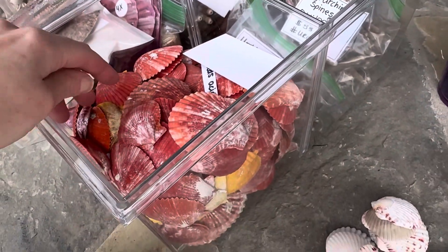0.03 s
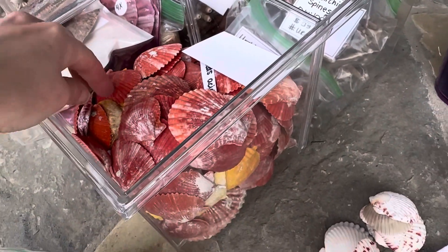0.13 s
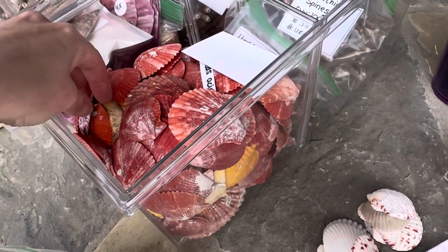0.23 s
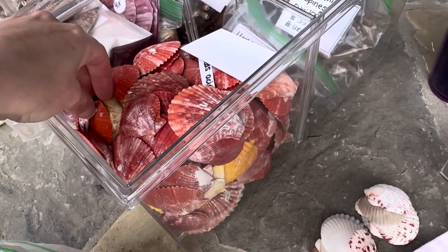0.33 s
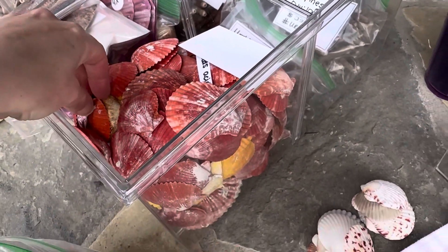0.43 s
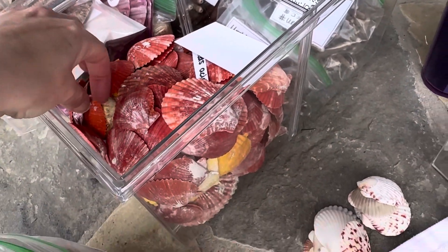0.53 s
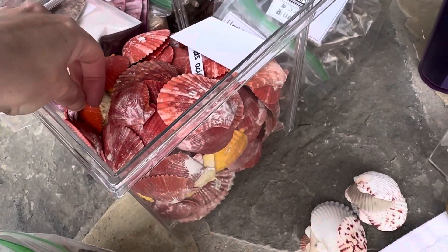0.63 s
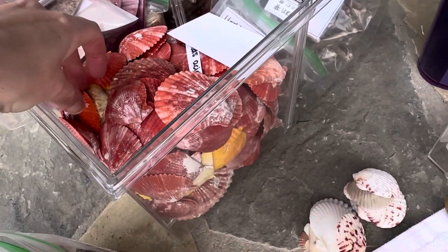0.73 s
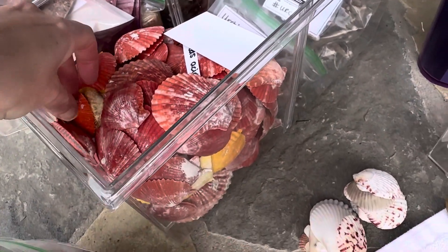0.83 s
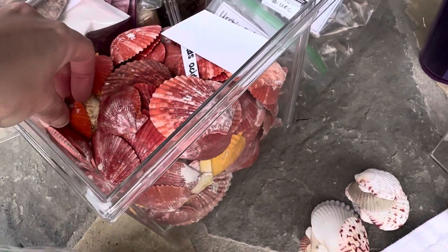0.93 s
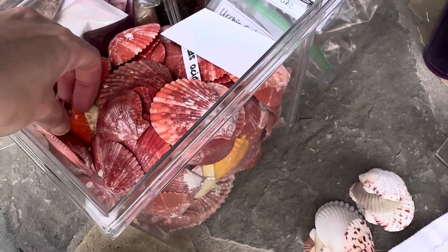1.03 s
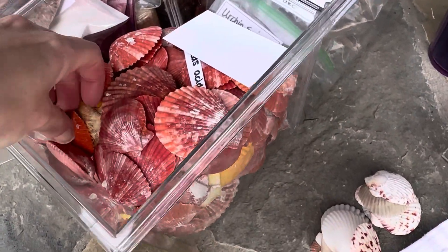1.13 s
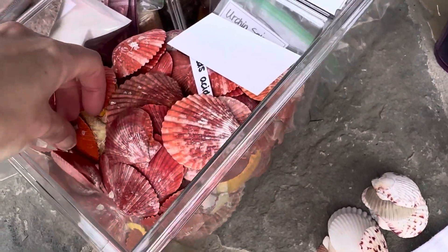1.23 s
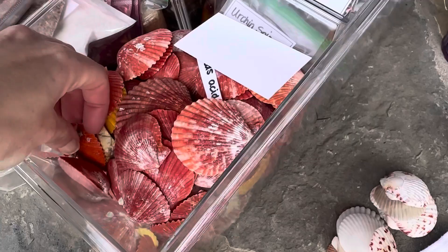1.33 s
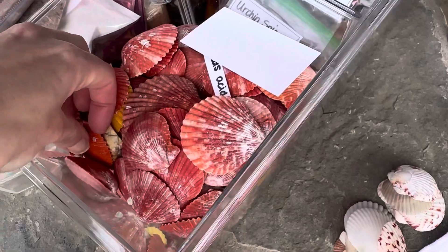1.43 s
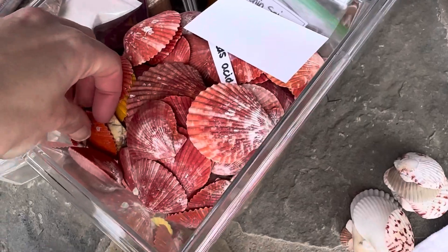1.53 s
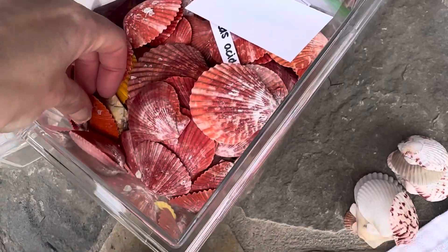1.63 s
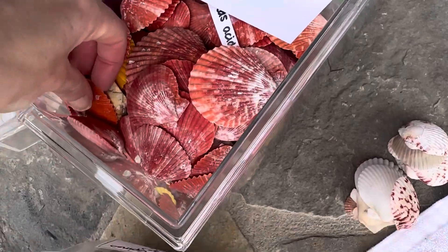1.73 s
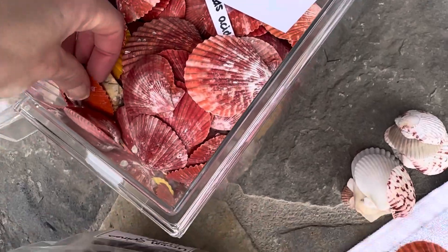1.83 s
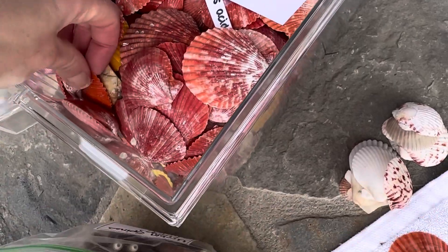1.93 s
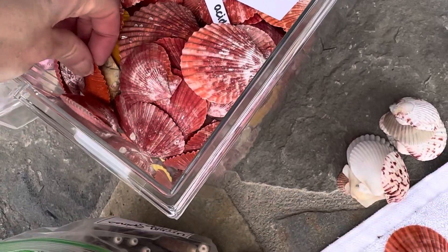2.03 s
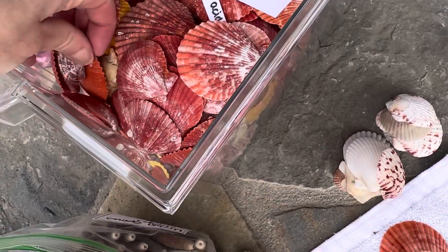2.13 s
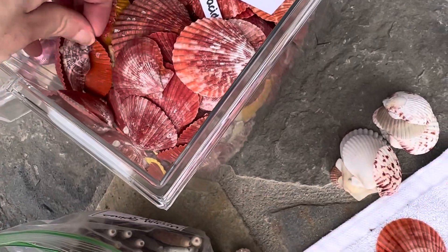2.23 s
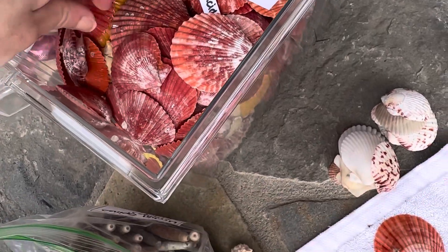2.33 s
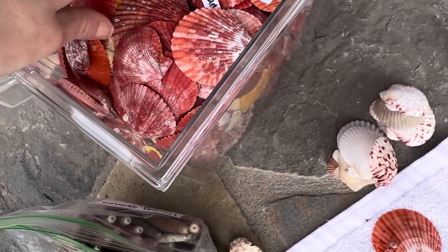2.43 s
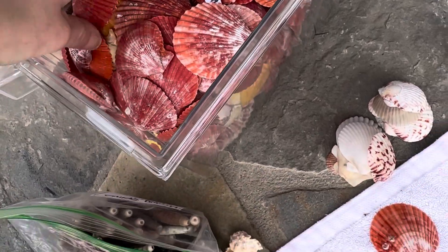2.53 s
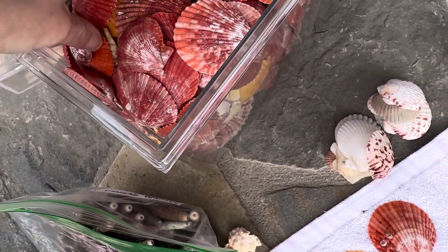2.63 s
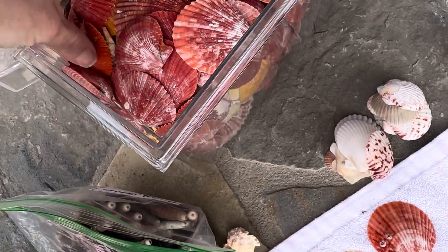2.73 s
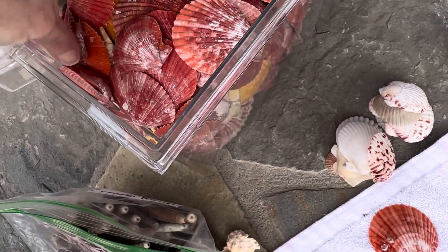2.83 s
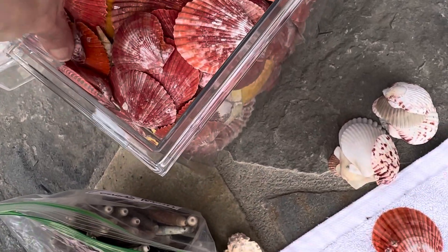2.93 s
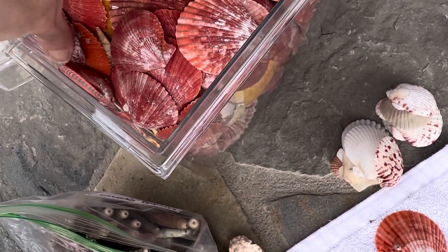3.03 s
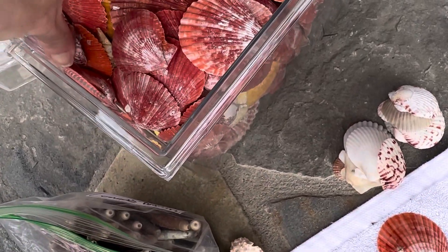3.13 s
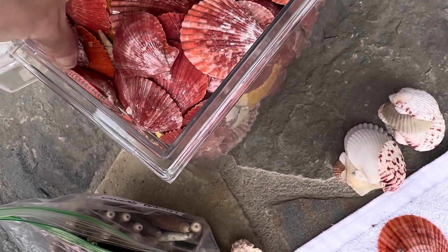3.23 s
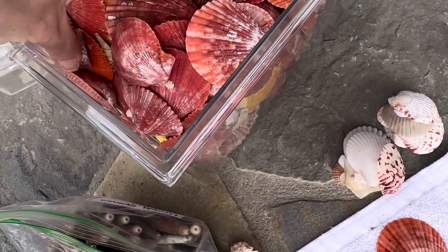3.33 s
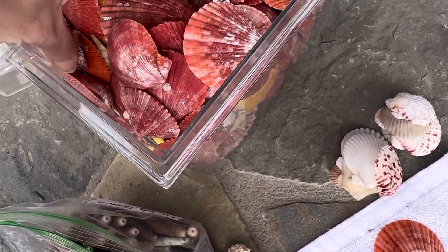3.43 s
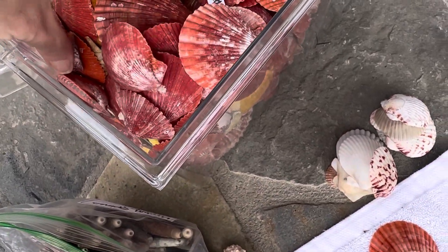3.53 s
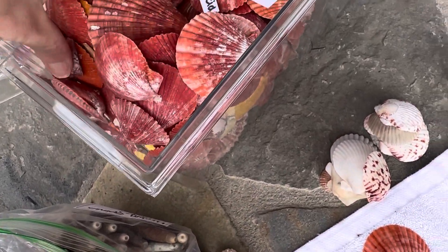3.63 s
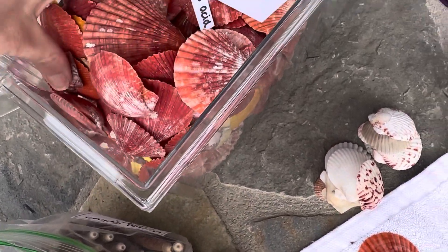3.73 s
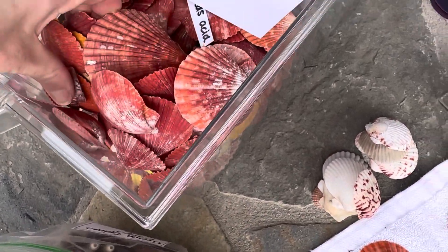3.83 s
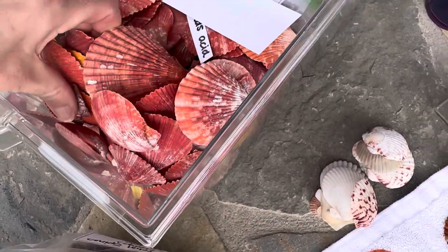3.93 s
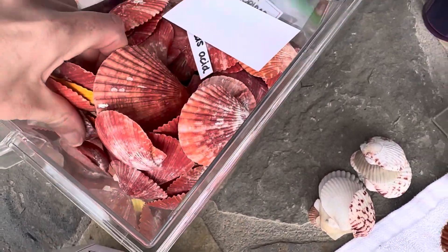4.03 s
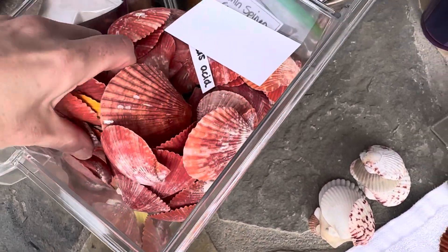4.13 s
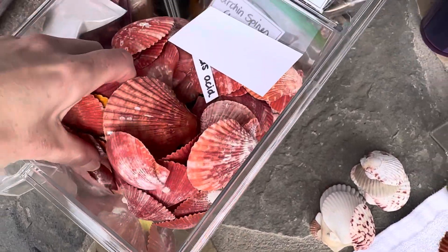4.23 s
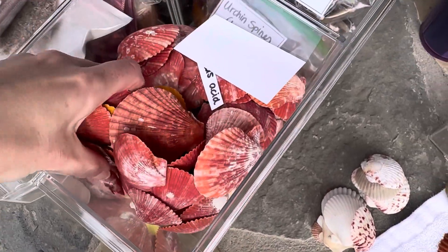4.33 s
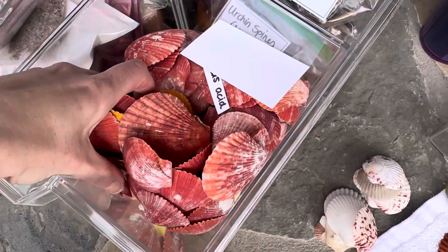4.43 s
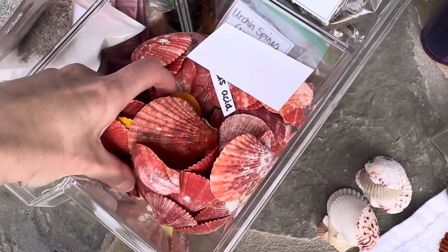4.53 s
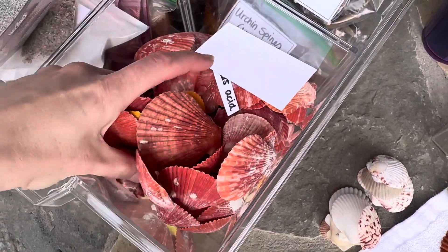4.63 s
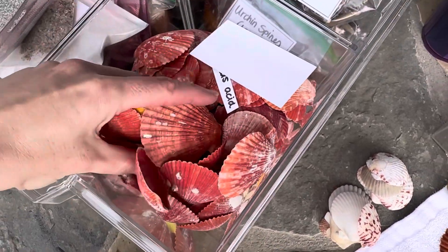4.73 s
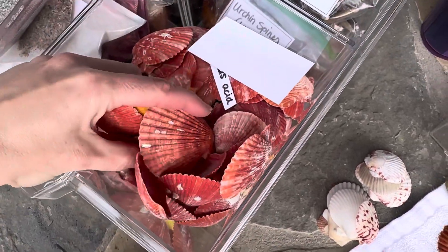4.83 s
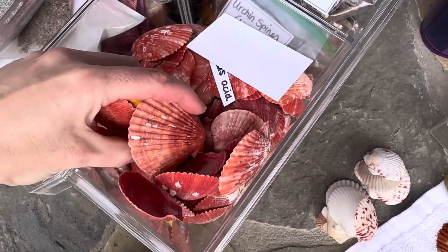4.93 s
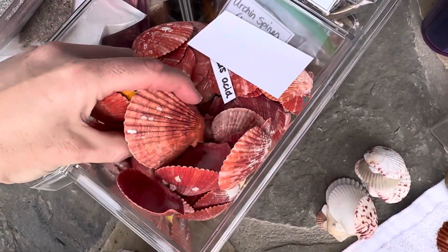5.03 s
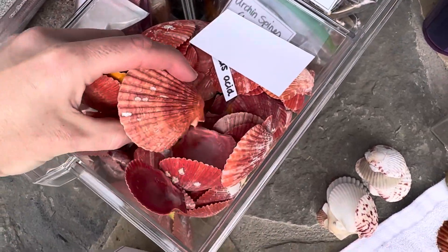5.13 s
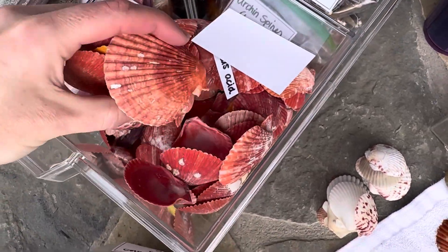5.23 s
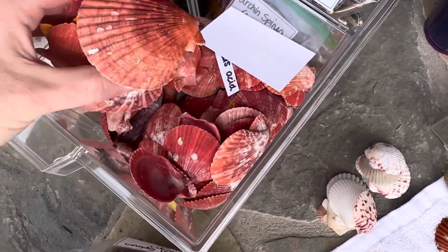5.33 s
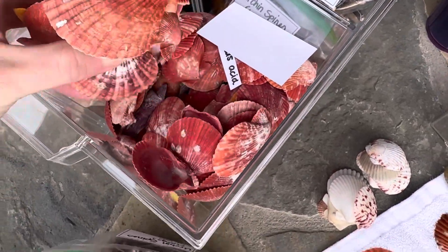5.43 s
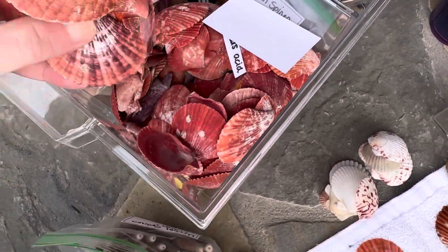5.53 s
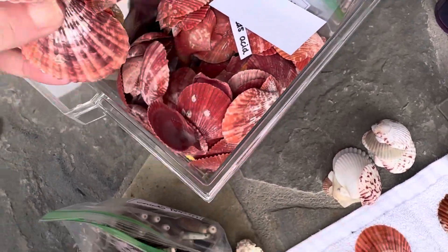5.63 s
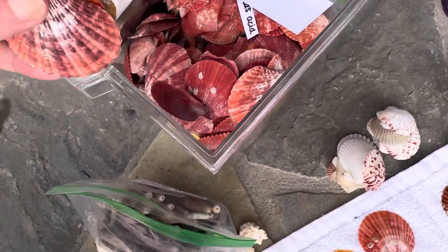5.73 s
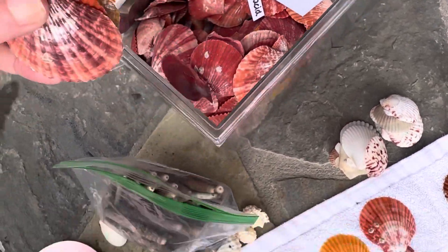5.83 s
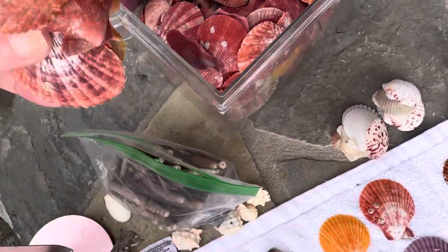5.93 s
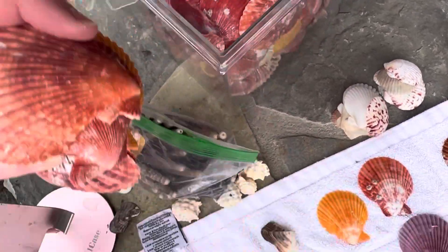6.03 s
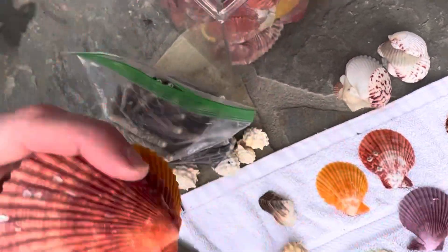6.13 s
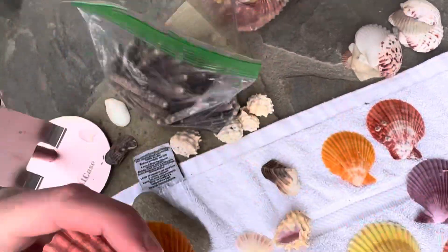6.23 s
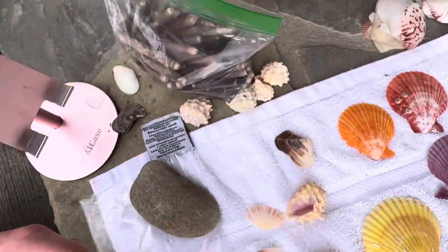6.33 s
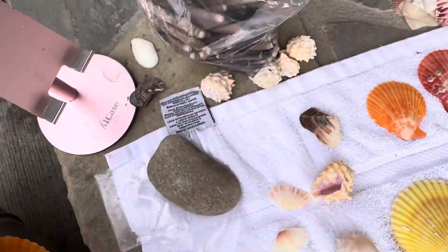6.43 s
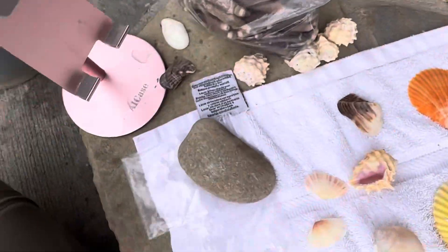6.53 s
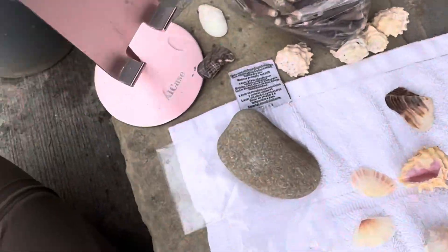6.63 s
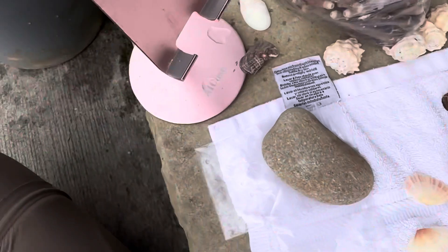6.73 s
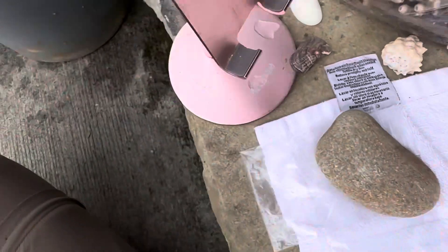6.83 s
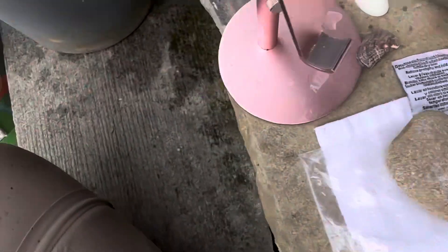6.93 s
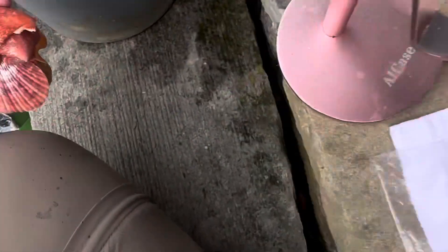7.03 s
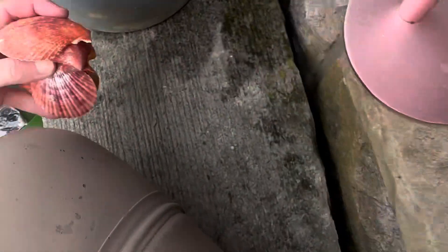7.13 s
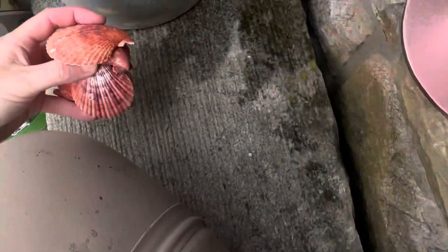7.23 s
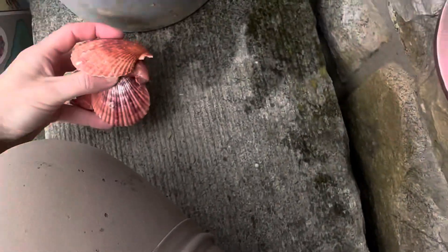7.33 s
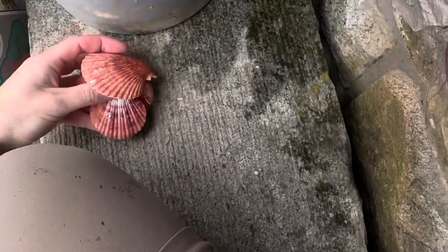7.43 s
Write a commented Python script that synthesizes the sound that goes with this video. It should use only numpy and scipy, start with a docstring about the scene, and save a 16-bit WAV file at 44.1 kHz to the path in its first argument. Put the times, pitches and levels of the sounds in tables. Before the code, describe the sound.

Close up outdoors, a hand digs through dry ribbed seashells in a thin plastic bin. Faint ticks grow into dense, irregular clacks and short gritty scrapes, with the bin wall knocking hollowly. After the last sharp clacks the rummaging stops, leaving low distant traffic, soft far tapping and thin bird chirps, before the lifted shells click crisply in the palm. Hand-held stereo phone, short yard echo.

```python
"""Rummaging through scallop shells

A hand rummages through dry shells in a clear plastic bin outdoors, close to a hand-held phone.
Shells clack as bursts of fast-dying noise, ribs rasp as streams of tiny ticks, and the bin wall resonates.
Then a handful is lifted and clicks in the palm. Far traffic rumbles as slowly swelling noise with a
faint rustle; a distant machine taps about eight times a second and small birds call as gliding tones."""
import sys
import numpy as np
from scipy import signal
from scipy.fft import rfft, irfft, next_fast_len
from scipy.io import wavfile
from scipy.ndimage import uniform_filter1d, map_coordinates

SR = 44100
rng = np.random.default_rng(int(sys.argv[2]) if len(sys.argv) > 2 else 0)


def invert_db(level):
    """Linear amplitude ratio for a level in decibels (20 dB per decade), elementwise."""
    return 10 ** (np.asarray(level, dtype=float) / 20)


def transcribe(u):
    """Save the signal u as a 16-bit wav file named by the first command-line argument.

    u: samples, shape (n,) or (channels, n), limited to [-1, 1]; the rate is SR.
    q: integer samples, one column per channel.
    """
    v = np.clip(np.atleast_2d(u).T, -1, 1)
    q = np.round(v * 32767).astype(np.int16)
    wavfile.write(sys.argv[1], SR, q)


N = 330264

# Single knocks of shell on shell: middle_s, level_db (before length adds energy),
# bowl_db (hollow of the shell, relative to the clack), edge_db (brittle treble, likewise), length_ms
SHELL_CLACKS = [(0.1196, -59, 0, -35, 6), (0.155, -63, 5, -25, 10), (0.2263, -40, -3, -23.0, 6.1),
                (0.2587, -44.5, 4, -20, 7), (0.3311, -44.5, -2, -14.5, 7.6), (0.3507, -51.5, 9, -19.5, 7),
                (0.4029, -47, 5, -11, 14.7), (0.4611, -37, -3.5, -1, 13), (0.4781, -41.5, -10, -13.5, 5.3),
                (0.5084, -37, -2, -12, 5.9), (0.5181, -32, 4, -19.5, 3.6), (0.528, -37.0, -7.5, -7.5, 4.6),
                (0.643, -33.5, -8, -22, 5.4), (0.6646, -27, -2, -12.5, 11.2), (0.79, -55, -5, -17.5, 6),
                (0.8109, -35.0, -3, -19, 13), (0.8306, -24.5, 1.5, -6.5, 8.5), (0.8641, -25, 6, -8, 5.7),
                (0.8793, -29.5, -11, -10.0, 11.4), (0.9482, -41, -9, -1.5, 6.2),
                (0.9751, -19, -4.0, -3, 5.3), (1.0484, -19.0, -1.5, -8.0, 6.9),
                (1.0889, -24.5, 0.5, -9, 6.0), (1.182, -43, 5, -14.5, 10.4), (1.2234, -37.5, 6, -7.5, 8),
                (1.2512, -18.5, 0.5, -3, 7.1), (1.269, -20, 3, -1, 6.6), (1.3022, -19, -0.5, -2.5, 19.6),
                (1.3512, -37.5, -3, -6.5, 15), (1.4183, -44, -3, -8, 7.5), (1.4813, -53, 10.5, -9, 10.6),
                (1.5023, -53, 6.5, -2, 7.3), (1.5773, -14.5, -5, -11, 8.5),
                (1.5976, -25.5, -7.0, -4.5, 9.0), (1.6969, -41.5, 4.5, -12.5, 13),
                (1.7154, -45, 4, -21.0, 3.1), (1.8164, -37.0, 7, -10.5, 10.2),
                (1.847, -40, 8.5, -19.5, 5.6), (1.9293, -40.5, 1, -5, 10.6), (1.947, -34, -1, -14.5, 5),
                (1.9598, -32.5, -2, -3.5, 12), (2.0027, -27.5, 0, -10.5, 12.1),
                (2.0389, -37.5, -1.5, -9.5, 8), (2.0534, -39.5, 1.5, -4.5, 7.8),
                (2.0682, -44.5, 2.5, -19.0, 27), (2.0877, -40.5, 0.5, -11, 14.4),
                (2.1016, -21, -10.5, -15.5, 5.2), (2.175, -36, 0, -14, 5.4), (2.1825, -37.5, 5.5, -9, 6.7),
                (2.2075, -32.5, -3.5, -0.5, 18), (2.2345, -24.5, -8, -1, 7.5),
                (2.2448, -22.5, -5, -1.5, 12.7), (2.2549, -22, -18, -3.5, 7), (2.2661, -18.5, -3, -4, 11.6),
                (2.2787, -22, -12, -3, 6.2), (2.4231, -33.5, 2.0, -10.5, 4.4), (2.4462, -30, -2, -8.5, 5.7),
                (2.4806, -35.5, 2.5, -6.5, 6.2), (2.5292, -33, 0.5, -18, 6.3), (2.5673, -20, -5, -12, 5.2),
                (2.5874, -20.5, -11, -4, 5.6), (2.6102, -28.5, 4, -13, 6.7), (2.6498, -29.5, 7, -1.5, 3.8),
                (2.789, -19.5, -1.5, -6.0, 6.1), (2.8099, -21.5, 0.5, -18.5, 5.0),
                (2.82, -27.5, -1, -20, 9), (2.8654, -33, -13.5, -4.5, 5.8), (2.9079, -35, 1, -3, 13),
                (2.957, -24, -4, -3, 5.3), (2.9847, -31, -11.5, -2.5, 20), (3.0422, -37, 12.5, -7, 7.5),
                (3.1422, -37, 7, -17.5, 7.5), (3.1669, -40.5, 1.0, -10.0, 13),
                (3.2165, -20.5, -4.5, -5.5, 12), (3.229, -26.5, -7, -14.5, 8),
                (3.2704, -31, 1.5, -0.5, 6.2), (3.3009, -32.5, -12.5, -10.5, 9.4),
                (3.3293, -17, -6.5, -3, 7), (3.3501, -20, -4, -4.5, 11.3), (3.4651, -28, -12.5, -18.5, 3.8),
                (3.4756, -31, -15, -4, 4), (3.4962, -42, -6.0, -13.5, 8.4), (3.5093, -40, -14, -13, 3.6),
                (3.5685, -28.0, -12, -12.5, 8.2), (3.5803, -26, -7.5, -8.5, 6.2),
                (3.6077, -31, -1.5, -2, 4.2), (3.6195, -28, -5.5, -11.5, 11), (3.6322, -28, 1.0, 0, 6.1),
                (3.6713, -24, -1, -6, 10.7), (3.7173, -28, -4.5, -8, 10.2), (3.733, -29.5, 4, -11, 4.7),
                (3.7506, -28.5, 0.5, -6.5, 8.3), (3.7796, -43.5, 3.5, -16.5, 15),
                (3.8454, -50.5, 14, -18, 13.7), (3.8784, -48.5, -2, -18.5, 8.3), (3.92, -20, -1.5, -4, 6.4),
                (3.9326, -31.5, -7.5, -13, 8.3), (3.9644, -35.5, -10, 6.5, 4.2),
                (3.9931, -13, -5.5, -9.5, 8), (4.01, -19.5, -5, -13.5, 16), (4.0475, -18.5, -3, -10, 4.5),
                (4.099, -40, 1, -11.5, 5.0), (4.1335, -36, -10, -10, 8.8), (4.1431, -28, 2, -10, 10.9),
                (4.1716, -24, -10.0, -4.0, 6.4), (4.1845, -23.5, -12, -5.0, 4.9),
                (4.2432, -37, -1.5, -12, 12.2), (4.2673, -21, -8, 1.5, 6.4), (4.3033, -21, -8.5, -3.5, 5.1),
                (4.3272, -37, -5, -5, 14.7), (4.3558, -36, -3, -0.5, 5.2), (4.3852, -25.5, -3, -10, 16),
                (4.4122, -25, 0, -11, 5.5), (4.4243, -29.5, -0.5, -9.5, 11.2),
                (4.4733, -23.5, -5.5, -1.5, 10), (4.5004, -30, -2.5, -1.5, 6),
                (4.5135, -28.5, -11, 4.5, 5.2), (4.5405, -23, -2.5, -1.5, 5.3),
                (4.5586, -16, -5.5, -9, 5.7), (4.565, -20.5, -3, -18.5, 7), (4.6088, -33, -20, 5.5, 9),
                (4.6335, -24, -11, -6.5, 12.5), (4.6671, -23, -2, -12, 4.5), (4.6962, -26, -7, -9, 7.9),
                (4.7228, -22.5, -5, -10, 17), (4.7813, -19.5, -10.5, -3, 6.4), (4.793, -23, -8, -11.5, 14),
                (4.8168, -24, -3.5, -10, 16.7), (4.8597, -35.5, -2.5, -11, 7.0),
                (4.8899, -16.5, -7.5, -8, 8.7), (4.94, -20.5, -10, -14, 12),
                (4.9537, -16, -8.0, -17.5, 5.2), (4.9735, -31, 1, -23.5, 6), (5.0568, -30, -12.5, -13, 6.6),
                (5.0806, -30.5, -3, -22, 4.5), (5.1065, -31.5, -4, -5.5, 7.5),
                (5.1167, -31, -9.5, -17, 9.7), (5.1341, -31.0, -5, -16.0, 4.7),
                (5.2365, -22.5, -8.5, -11, 5.2), (5.25, -20, -9.5, -4.5, 6.5),
                (5.2868, -26.5, -17.5, -1.5, 8.5), (5.3037, -21, -10.5, -7, 17.5),
                (5.3251, -17.5, -14, -5, 3.8), (5.4573, -45, -5.5, -17, 4.3),
                (5.4853, -20.5, -28, -4.0, 7.2), (5.5007, -27.5, -24, -2, 15),
                (5.5314, -38.5, -25, -8.5, 4.5), (5.6256, -12.5, -9.5, -4, 7),
                (5.6599, -32.5, -6, -7.5, 10.5), (5.6751, -19.5, -12.5, -1.5, 5.7),
                (5.7082, -16.5, -1, -9, 6.8), (5.9509, -42.5, -15, -6.5, 11.6), (6.898, -44.5, -15, -11, 7),
                (7.2398, -47, -17.0, -12.5, 12.5), (7.2722, -50.5, -18.0, -17, 8.5),
                (7.3271, -49.5, -16, -18, 7.4), (7.3703, -40.5, -21, -16.5, 11),
                (7.4052, -35.5, -20, -13, 3), (7.423, -28, -37, -8.5, 10), (7.434, -18, -27, -0.5, 9),
                (7.4488, -16.5, -30.5, -5.5, 13), (7.4578, -17, -30, -4.5, 10),
                (7.4765, -31.5, -27, -7.5, 8.8)]
THUD_DB, THUD_SCATTER_DB = -9.5, 1.5  # the bin thuds with the bowl of the shell: dB relative to bowl, dB


def clacks(count=16):
    """Each contact is another pair of shells: a run of small slips, as rib catches on rib."""
    s, db, bowl_db, edge_db, ms = np.vstack([SHELL_CLACKS, patter()]).T
    thud_db = bowl_db + THUD_DB + THUD_SCATTER_DB * rng.standard_normal(len(s))
    colours = [clack_colour(*levels) for levels in zip(thud_db, bowl_db, edge_db)]

    lag, size = rng.random((len(s), 2, count)).transpose(1, 0, 2)
    run = np.maximum(ms - 3.5, .5)[:, None] / 1000 * SR  # the knock itself fills the rest
    lead_in = 300  # samples kept free for the lead-in
    place = np.clip(lead_in + (1.3 * lag - .3) * run, 0, 1600).astype(int)
    strength = size * np.clip(lag / 0.3, .15, 1)  # the run fades in over its first part
    push = np.zeros((len(s), 3072))
    push[np.arange(len(s))[:, None], place] = strength ** 2
    push *= ms[:, None] / push.sum(axis=1, keepdims=True)  # a longer contact carries more energy

    starts = np.round((s - ms / 2000) * SR).astype(int) - lead_in
    knocks = ringing(colours, push).transpose(1, 0, 2)
    out = np.zeros((2, N + SR))
    for start, gain, knock in zip(starts, invert_db(db), knocks):
        out[:, start:start + 3072] += gain * knock
    return out[:, :N]


def clack_colour(thud, bowl, edge):
    """The bin's bass, the bowl's middle and the edge's treble in one clack, as (Hz, dB) points."""
    return [(90, thud - 3.5), (210, thud + 11.2), (315, thud + 13.7), (450, thud + 9.6),
            (620, bowl + 4.47), (950, bowl + 8.51),
            (1900, 0), (2700, -1.33), (4500, 0.5), (7500, -6.5),
            (10500, edge + 4), (13200, edge - 6.5), (15300, edge + 2.8), (16800, edge - 24.5)]


PATTER_DB, PATTER_SCATTER_DB = 5.5, 3  # level relative to the rasp, and its scatter
PATTER_BOWL_DB = -6  # relative to the wall's level over the rasp
PATTER_EDGE_DB, PATTER_COLOUR_DB = -14.5, 5  # edge relative to the clack; scatter of bowl and edge
PATTER_MS = 7  # middle value of the length


def patter(count=90):
    """Small chance contacts inside the pushes, as rows like the clacks; their level follows the rasp."""
    start, length = np.transpose(HAND_STROKES)[:2]
    edges = np.cumsum(np.append(0, length))  # the pushes laid end to end
    place = rng.random(count) * edges[-1]
    which = np.searchsorted(edges, place) - 1
    s = np.minimum(start[which] + place - edges[which], (N - 1) / SR)
    level, bowl, edge, last = rng.standard_normal((count, 4)).T
    rasp_db, wall_db = np.array(strokes())[:, (s * SR).astype(int)]
    db = rasp_db + PATTER_DB + PATTER_SCATTER_DB * level
    bowl_db = wall_db - rasp_db + PATTER_BOWL_DB + PATTER_COLOUR_DB * bowl
    edge_db = PATTER_EDGE_DB + PATTER_COLOUR_DB * edge
    return np.transpose([s, db, bowl_db, edge_db, PATTER_MS * np.exp(0.25 * last)])


# How fast shell vibrations die: pitch_hz, time_to_fall_60_db_s
RING_TIME = [(150, 0.026), (600, 0.036), (2000, 0.029), (6000, 0.023), (15000, 0.0043)]
# Bending waves build up, the lows later: pitch_hz, build_up_s
BUILD_UP = [(150, 0.0016), (1000, 0.00088), (4000, 0.00067), (10000, 0.00058)]
# The phone's body and the bin walls scatter the middle pitches: pitch_hz, left_right_likeness (0 to 1)
NEAR_LIKENESS = [(150, .92), (350, .82), (700, .6), (1400, .6), (2800, .3), (5600, .28), (8500, .85),
                 (14000, .8)]
BANDS = 125 * 2 ** np.arange(0, 7.1, .5)  # centres of the half-octave groups of vibrations, Hz
LUMPS_DB = 3  # how unevenly one shell rings


def ringing(colours, push):
    """One stereo knock per colour: vibrations so dense and damped that each half octave is a noise
    that swells and dies, fed by the energy push of the contact."""
    size = push.shape[1]
    t, hz = np.arange(size) / SR, np.fft.rfftfreq(size, 1 / SR)
    die = np.log(1000) / along(RING_TIME, BANDS)
    rise = 1 / along(BUILD_UP, BANDS)
    shape = np.exp(-np.outer(die, t)) * (1 - np.exp(-np.outer(rise, t)))
    shape /= shape.max(axis=1, keepdims=True)
    # overlapping triangles share the spectrum among the bands
    group = np.clip(1 - 2 * abs(np.log2((hz + 1) / BANDS[:, None])), 0, 1)

    noise = rng.standard_normal((3, len(colours), size))
    lumps = uniform_filter1d(noise[2, :, :len(hz)], 28, axis=1)  # each shell favours its own pitches
    gain = invert_db(np.array([along(c, hz) for c in colours]) + LUMPS_DB * unit(lumps))
    right, other = rfft(noise[:2]) * gain
    alike = along(NEAR_LIKENESS, hz)
    left = alike * right + np.sqrt(1 - alike ** 2) * other
    pair = np.array([left, right])

    knocks = 0
    for band, envelope in zip(group, shape):
        energy = irfft(rfft(push) * rfft(envelope ** 2), size)
        knocks = knocks + irfft(pair * band, size) * np.sqrt(abs(energy))
    return knocks


# Colour of rubbed shell: pitch_hz, level_db
RUBBED_SHELL = [(820, -31.5), (1400, 5), (2030, -6), (2160, 2.5), (4780, -1.5), (7530, -7.5), (9160, -9),
                (10100, -20.5), (13300, -19), (15200, -13), (16000, -19.5), (16500, -32.5)]
# Resonances of the bin wall and shell bowls: pitch_hz, width_hz, level_db
BIN_WALL = [(181, 110, -2.5), (302, 63, 6.5), (650, 130, 1.5), (924, 190, 0.5), (1580, 460, -3)]


def rasp(count=10):
    """Rib ticks knock many shells in turn and shake the bin wall."""
    rasp_db, load_db = strokes()
    ticks = grit(2900, spread_db=2.5)
    which = rng.integers(count, size=N)  # the shell that each tick knocks
    bodies = ringing([RUBBED_SHELL] * count, np.tile(signal.unit_impulse(1536), (count, 1)))
    shells = 0
    for k in range(count):
        own_ticks = (ticks * (which == k))[None]
        shells = shells + signal.oaconvolve(own_ticks, bodies[:, k], axes=1)[:, :N]

    one_side = np.array([grit(1200, spread_db=4.0), grit(2200, spread_db=-3.0)])
    shakes = grit(1500, spread_db=0.0) + 0.2 * one_side  # mostly the same on both sides
    wall = resonant(resonant(shakes, BIN_WALL), [(496, 1900, 0)])
    return invert_db(rasp_db) * unit(shells) + invert_db(load_db) * unit(wall)


def grit(rate, spread_db):
    """Random tiny contacts, nominally rate a second, coming in clumps."""
    chance = rate / SR * invert_db(4.9 * wobble(45))
    return (rng.random(N) < chance) * rng.standard_normal(N) * invert_db(spread_db * rng.exponential(size=N))


# Pushes of the hand, ribs dragging over ribs: start_s, length_s, rasp_db (halfway),
# swell_db (from start to end), wall_db (bin wall relative to rasp)
HAND_STROKES = [(0.217, 0.06, -63.5, -15.5, 10), (0.318, 0.04, -74, 8, 11), (0.395, 0.03, -72.5, 9.5, 5.5),
                (0.445, 0.09, -57.5, -2.5, 1), (0.637, 0.055, -52, 3.5, -5), (0.775, 0.12, -49.5, 12, 4),
                (0.924, 0.06, -51, 23, 6), (1.043, 0.074, -47.5, -9, 7), (1.128, 0.07, -57, -8.5, 9.5),
                (1.216, 0.145, -39.5, -4, 4.5), (1.408, 0.11, -67, 4.5, 9), (1.562, 0.058, -41.5, -12.5, 3),
                (1.682, 0.05, -59.5, 6.5, 6.5), (1.803, 0.06, -59.5, -4, 8.5), (1.925, 0.23, -44, 3, 3.5),
                (2.141, 0.15, -35.5, 9.5, -1.5), (2.419, 0.075, -51, -4.5, 7),
                (2.512, 0.18, -45.5, -3.5, 4), (2.782, 0.055, -44, -6.5, 3), (2.854, 0.155, -37, 1.5, 2),
                (3.027, 0.06, -53.5, -4, 3.5), (3.121, 0.045, -54.5, -2.5, 8),
                (3.203, 0.08, -37.5, -6.0, -2.5), (3.286, 0.085, -35, -8, 2), (3.426, 0.09, -50, 3.0, 2),
                (3.552, 0.135, -36, 5, -0.5), (3.71, 0.075, -43.5, -1.5, 0), (3.823, 0.07, -52.5, 5, 11.5),
                (3.907, 0.15, -32.5, 5, -2.5), (4.084, 0.11, -45.5, 10.5, 5), (4.21, 0.12, -44.5, 9.5, 1.5),
                (4.356, 0.228, -33.5, 4.5, -2.5), (4.601, 0.15, -32.5, 5, -1.5),
                (4.77, 0.21, -31.5, 1.5, -2.0), (5.035, 0.12, -43, -15.5, 3.5),
                (5.232, 0.11, -36.5, 0.5, 2.5), (5.477, 0.07, -45.5, -13.5, -13.5),
                (5.616, 0.115, -39.5, 2.5, -1.5), (5.946, 0.03, -59.5, -12.5, -2),
                (7.227, 0.16, -66.0, 0, -6), (7.416, 0.085, -34.5, 3, -36)]
RISE_DB_PER_S, SETTLE_DB_PER_S = 2600, 340  # a push sets in fast; the heap settles more slowly


def strokes():
    """Levels of rasp and shaken wall in dB: each push rises, swells or fades, then settles."""
    t, power = np.arange(0, N, 32) / SR, 1e-12
    for s, length, db, swell_db, wall_db in HAND_STROKES:
        shape_db = db + swell_db * (np.clip((t - s) / length, 0, 1) - .5)
        shape_db -= RISE_DB_PER_S * np.maximum(s - t, 0)
        shape_db -= SETTLE_DB_PER_S * np.maximum(t - s - length, 0)
        power = power + invert_db(shape_db + np.array([[0], [wall_db]])) ** 2
    return [np.interp(np.arange(N) / SR, t, 10 * np.log10(p)) for p in power]


# Paving and walls answer: pitch_hz, time_to_fall_60_db_s (of the early part)
YARD_ECHO = [(200, 0.21), (2000, 0.075), (10000, 0.055)]


def yard(x, count=12):
    """Echo as decaying noise: each pitch of the yard's answer dies at its own speed."""
    out = np.zeros((2, N + SR))
    # the echo is drawn afresh for each part, so no pitch stands out steadily
    for part in np.array_split(np.arange(N), count):
        hz, t, z = signal.stft(rng.standard_normal((2, SR // 3)), SR, nperseg=256)
        fall_db = -60 * t / along(YARD_ECHO, hz)[:, None]
        fall = invert_db(fall_db) + invert_db(fall_db / 3 - 24)  # farther walls answer late and faintly
        tail = signal.istft(z * fall, SR, nperseg=256)[1]
        wet = signal.fftconvolve(x[None, part], tail / np.linalg.norm(tail[0]), axes=1)
        out[:, part[0]:part[0] + wet.shape[1]] += wet
    return out[:, :N]


# Distant taps: start_s, level_db (of the puff, before the resonances)
FAR_TAPS = [(6.069, -48), (6.201, -46.5), (6.32, -49), (6.458, -47.5), (6.546, -42.5), (6.573, -60),
            (6.706, -48), (6.83, -57), (6.949, -43), (7.058, -51), (7.19, -52), (7.294, -63)]
# Resonances of what is tapped: pitch_hz, width_hz, level_db
TAPPED_BODY = [(247.5, 140, 6), (639, 220, 6), (1100, 400, 3), (1890, 950, -7)]


def taps():
    """Dull far knocks: a short puff of noise into a few resonances."""
    puffs, t = np.zeros(N + SR), np.arange(600) / SR
    for s, db in FAR_TAPS:
        envelope = invert_db(db - 60 * t / 0.045) * (1 - np.exp(-t / 0.0019))
        puffs[round(s * SR):][:600] += envelope * rng.standard_normal(600)
    return resonant(puffs[:N], TAPPED_BODY)


# Bird notes, each a list of points: time_s, pitch_hz, level_db
BIRD_NOTES = [
    [(6.255, 7930, -88), (6.265, 7650, -85), (6.28, 7250, -93)],
    [(6.445, 8300, -80), (6.455, 7880, -60), (6.475, 7500, -71)],
    [(6.46, 5450, -76), (6.5, 5330, -77), (6.555, 5200, -79), (6.585, 4390, -77), (6.62, 3870, -73),
     (6.65, 3660, -67), (6.69, 3720, -73), (6.77, 3820, -81)],
    [(6.43, 2950, -77), (6.45, 2800, -77), (6.49, 2670, -82)],
    [(6.54, 8400, -78), (6.55, 7200, -62), (6.56, 6770, -83)],
    [(6.585, 5900, -74), (6.6, 6360, -51), (6.64, 6600, -83), (6.68, 6230, -69), (6.72, 6360, -71)],
    [(6.68, 9200, -83), (6.688, 7400, -59), (6.7, 6280, -75)],
]


def birds():
    """Thin gliding whistles with soft ends, unsteady in pitch and level."""
    out, t = 0, np.arange(N) / SR
    for note in BIRD_NOTES:
        hz, db = curves(note)
        outside = np.maximum(note[0][0] - t, 0) + np.maximum(t - note[-1][0], 0)
        level = invert_db(db - 3800 * outside + 5.5 * wobble(90))  # ends fade at 3800 dB a second
        phase = 2 * np.pi * np.cumsum(hz * (1 + .007 * wobble(300))) / SR
        out = out + level * np.sin(phase)
    return out


# Level of the traffic, before a random wobble: time_s, level_db
TRAFFIC_LEVEL = [(0.0, -59.5), (0.48, -53.5), (0.75, -59), (1.17, -51.5), (1.56, -55.5), (2.04, -55),
                 (4.82, -52.5), (5.07, -56.5), (5.63, -55), (5.84, -60.5), (7.49, -53.5)]
# Level of a faint far hiss, the rustle: time_s, level_db
RUSTLE_LEVEL = [(5.9, -66.5), (6.05, -70), (6.27, -76.5), (6.43, -76), (6.51, -67), (6.67, -61.5),
                (6.83, -62.5), (7.08, -60), (7.11, -76), (7.14, -65), (7.17, -63.5), (7.3, -67)]
# Colour of the traffic rumble: pitch_hz, level_db
RUMBLE_COLOUR = [(12, -43), (20, -28), (54, -0.5), (125, 2.5), (211, -5), (258, -20), (455, -23.5),
                 (500, -23.5), (650, -48.5), (1100, -120)]
# Colour of the rustle: pitch_hz, level_db
RUSTLE_COLOUR = [(150, -19.5), (250, 2), (406, -8), (671, -3), (2660, -14), (6480, -14.5), (7880, -21.5),
                 (8680, -43), (12000, -40), (15600, -72.5), (22000, -120)]


def outdoors():
    """Traffic rumble and a faint rustle: coloured noises, both swelling."""
    rumble_db = curves(TRAFFIC_LEVEL)[0] + 1.7 * wobble(12)
    rumble = invert_db(rumble_db) * rush(RUMBLE_COLOUR, patchy_db=1.0)
    return rumble + invert_db(curves(RUSTLE_LEVEL)[0]) * rush(RUSTLE_COLOUR, patchy_db=3.0)


# Stereo spread of the background: pitch_hz, left_right_likeness (-1 to 1)
FAR_LIKENESS = [(60, 0.78), (240, 0.71), (950, -0.3), (3770, -0.09), (15000, 0.023)]


def rush(spectrum, patchy_db):
    """Stereo noise of rms 1 whose level differs from patch to patch in time and pitch."""
    z = signal.stft(rng.standard_normal((2, N)), nperseg=512)[2]
    field = uniform_filter1d(uniform_filter1d(rng.standard_normal(z.shape[1:]), 6, 0), 14, 1)
    pair = signal.istft(z * invert_db(patchy_db * unit(field)), nperseg=512)[1][:, :N]

    def spread(hz):
        turn = np.arccos(np.clip(along(FAR_LIKENESS, hz), -1, 1)) / 2
        return invert_db(along(spectrum, hz)) * [np.cos(turn), np.sin(turn)]

    mid, side = filtered(pair, spread)
    return unit(np.array([mid + side, mid - side]))


def ports(pair, tilt, lead):
    """Two microphones: half of the level and phase difference on each side."""
    side = np.array([[.5], [-.5]])
    return filtered(pair, lambda hz: invert_db(side * along(tilt, hz)) * np.exp(1j * side * along(lead, hz)))


def resonant(x, modes):
    """x through a few resonances of (Hz, width Hz, dB), added with alternating sign."""
    def response(f):
        total = 0
        for k, (centre, width, db) in enumerate(modes):
            damping = 1j * f * width
            total = total + (-1) ** k * invert_db(db) * damping / (centre ** 2 - f * f + damping)
        return total

    return filtered(x, response)


def filtered(x, response):
    """x times a complex response of frequency."""
    m = next_fast_len(N + SR // 2)
    return irfft(rfft(x, m) * response(np.fft.rfftfreq(m, 1 / SR)), m)[..., :N]


def wobble(rate):
    """A smooth random curve, rate knots a second."""
    knots = rng.standard_normal(int(N * rate / SR) + 4)
    return map_coordinates(knots, [np.arange(N) * rate / SR])


def curves(rows):
    """One value per sample for each column after the time."""
    s, *cols = np.transpose(rows)
    return [np.interp(np.arange(N) / SR, s, c) for c in cols]


def along(points, hz):
    """Values at hz, read between (Hz, value) points on a log pitch axis."""
    f, v = np.transpose(points)
    return np.interp(np.log(hz + 1), np.log(f + 1), v)


def unit(x):
    """Scaled to rms 1."""
    return x / np.sqrt(np.mean(x ** 2) + 1e-20)


# Close sounds at the two microphones: pitch_hz, left_minus_right_db
NEAR_TILT = [(60, -1.5), (150, -3.5), (380, -1), (700, -6), (1290, -6.5), (2380, -7.5), (4400, -9),
             (7000, -9), (8800, -1), (15000, 0)]
# Close sounds at the two microphones: pitch_hz, left_lead_radians
NEAR_LEAD = [(200, 0), (430, -.6), (950, .5), (2500, -1.5), (4130, .3), (7490, 6.6), (8270, 3.5),
             (9470, 3.2), (10400, 3.6), (11800, 3.5), (12700, 4.7), (16000, 4.7)]
# Far sounds at the two microphones: pitch_hz, left_minus_right_db
FAR_TILT = [(60, -0.5), (240, -3.5), (950, -4), (3770, -8.5), (15000, -8)]


def scene():
    """Shells close by, in the yard; far sounds mostly by their echoes."""
    # small things radiate no deep bass
    near = filtered(clacks() + rasp(), lambda hz: (1j * hz / (70 + 1j * hz)) ** 2)
    close = ports(near + invert_db(-10) * yard(near[1]), NEAR_TILT, NEAR_LEAD)
    far = taps() + birds()
    background = far + invert_db(1.0) * yard(far) + outdoors()
    return close + ports(background, FAR_TILT, [(100, 0.007)])


def band_limit(x):
    """A steep low-pass at the top of the band."""
    return signal.sosfilt(signal.butter(12, 17150, fs=SR, output="sos"), x)


def record(dry):
    """The loudest peaks are rounded off smoothly, staying below 0.95."""
    soft = dry / (1 + abs(dry / .95) ** 4) ** (1 / 4)
    return band_limit(soft)


dry = scene()
out = record(dry)
transcribe(out)
```